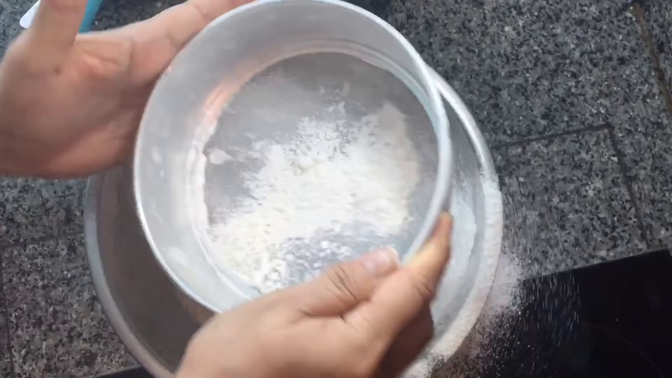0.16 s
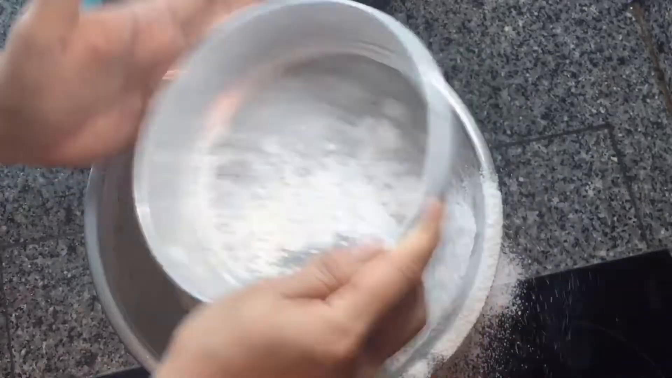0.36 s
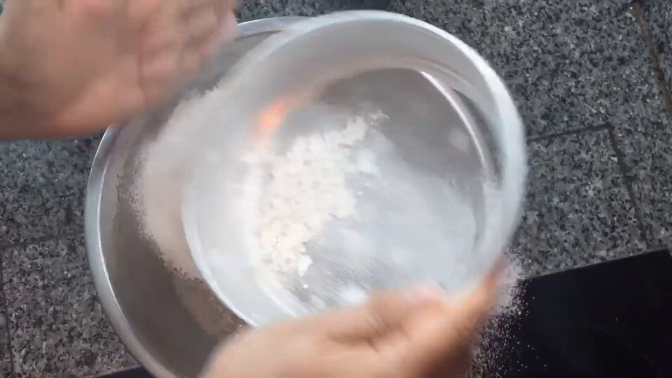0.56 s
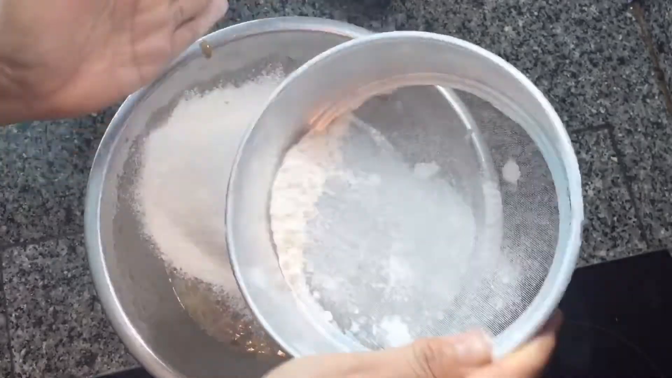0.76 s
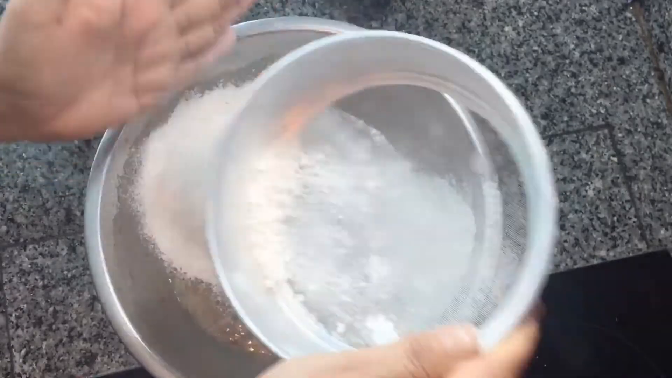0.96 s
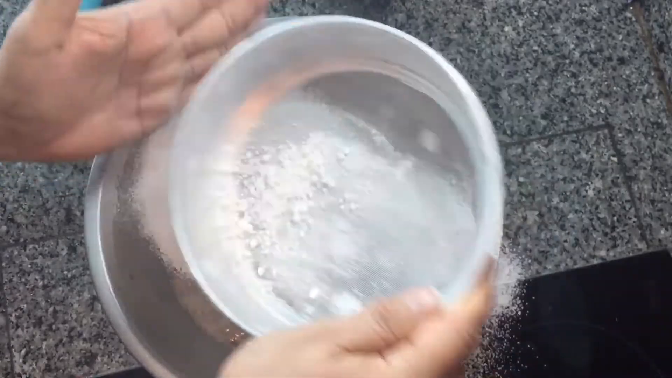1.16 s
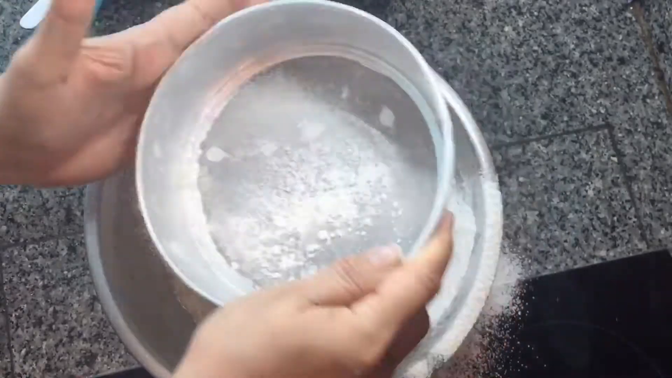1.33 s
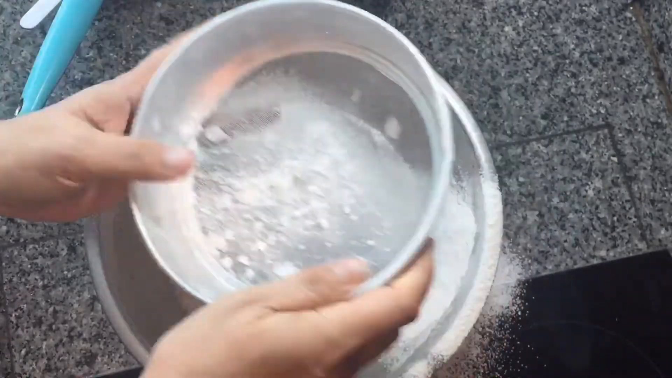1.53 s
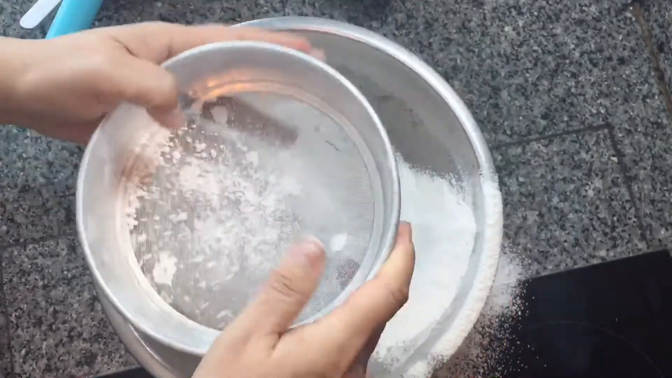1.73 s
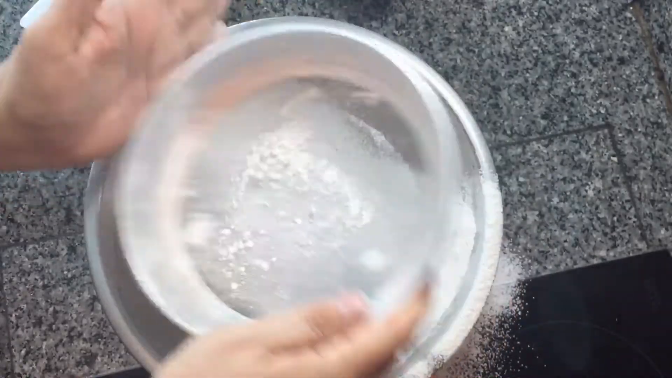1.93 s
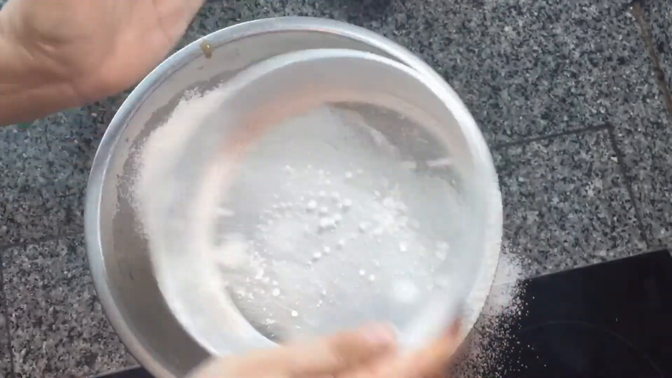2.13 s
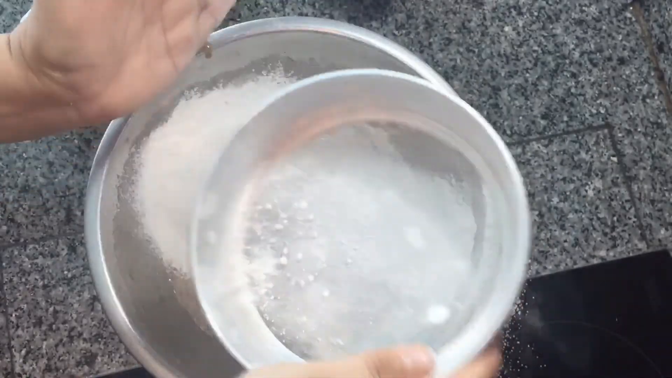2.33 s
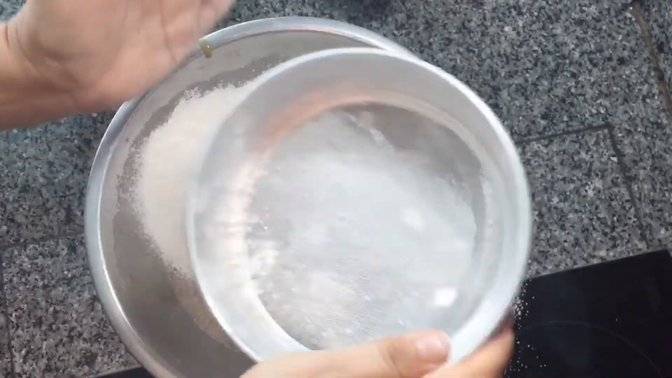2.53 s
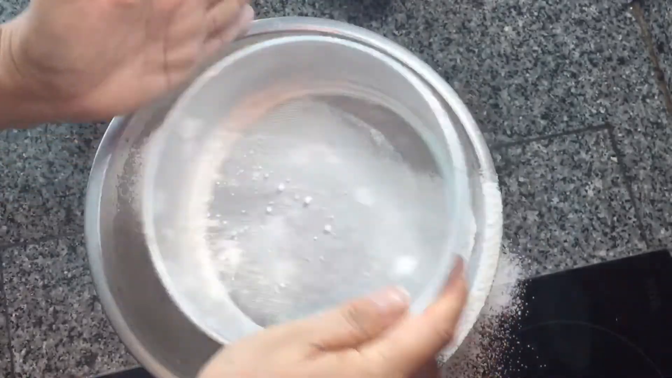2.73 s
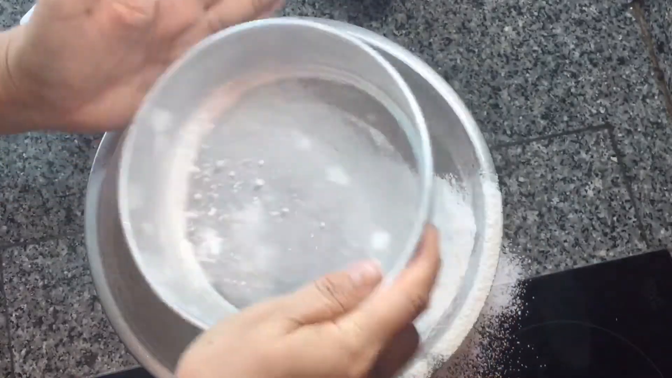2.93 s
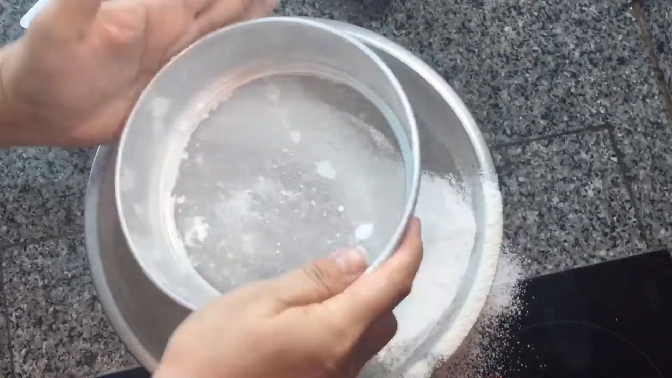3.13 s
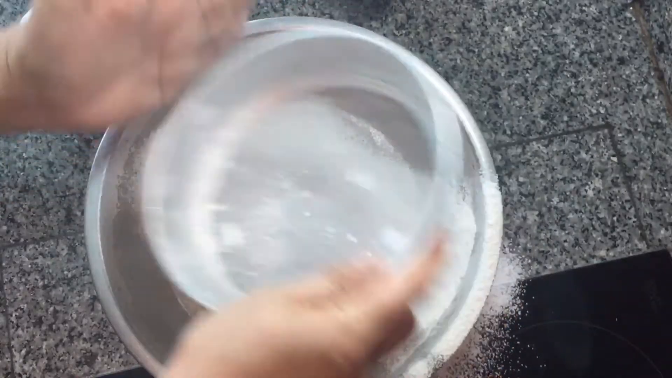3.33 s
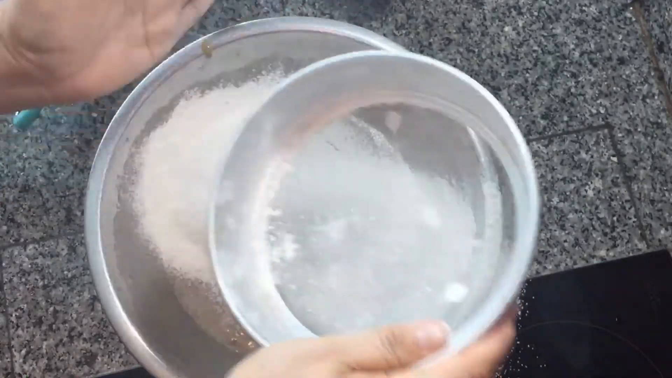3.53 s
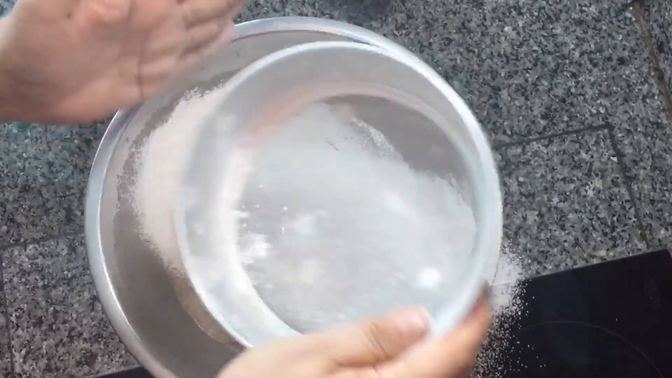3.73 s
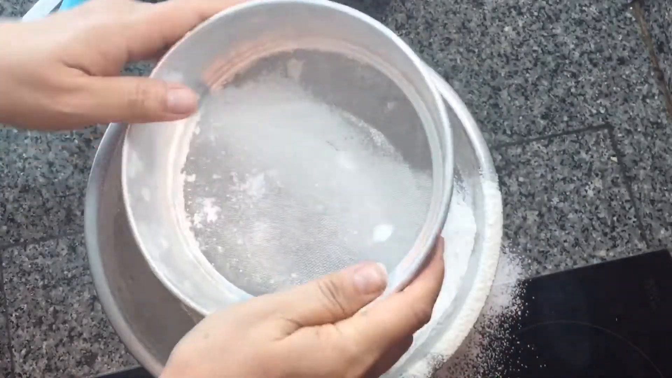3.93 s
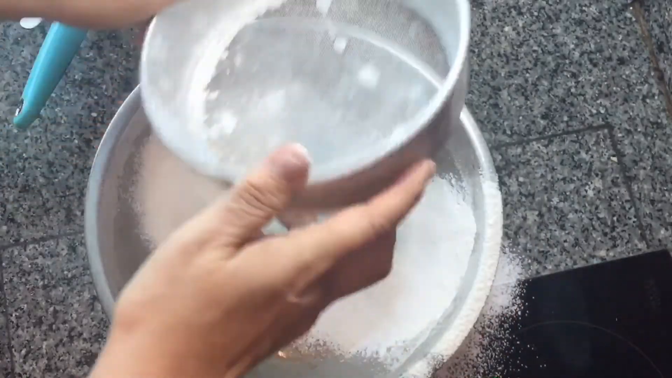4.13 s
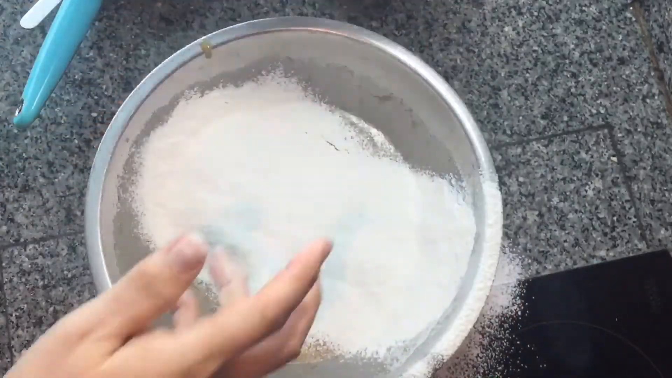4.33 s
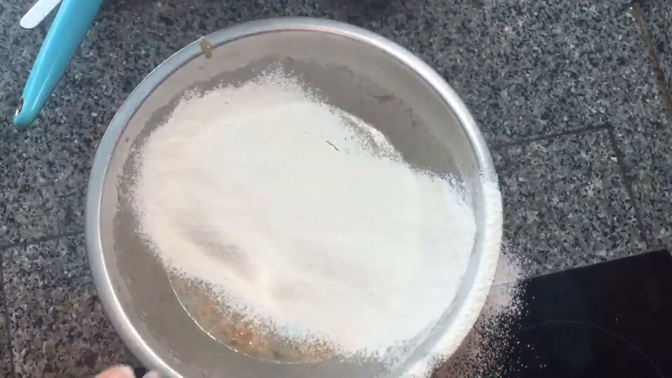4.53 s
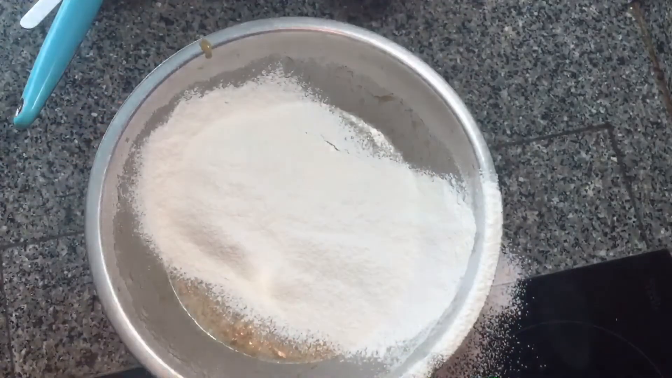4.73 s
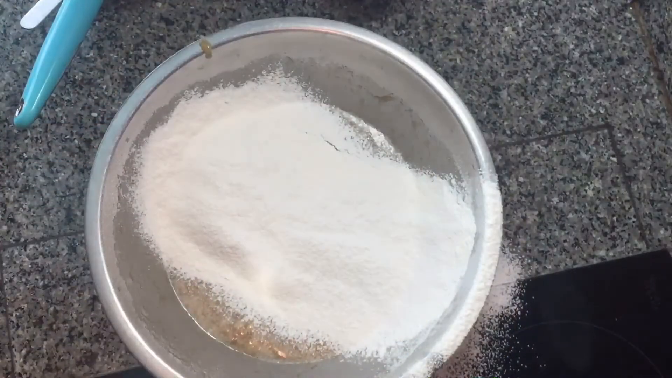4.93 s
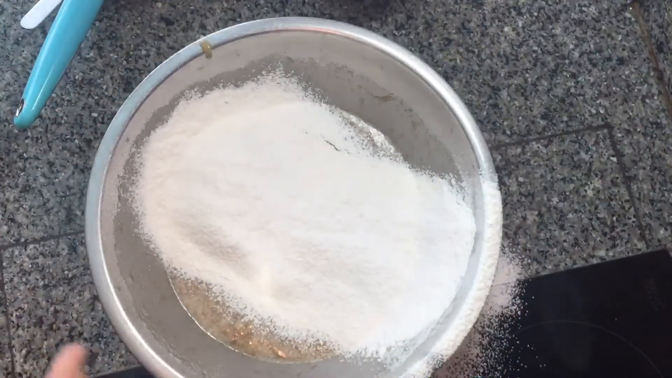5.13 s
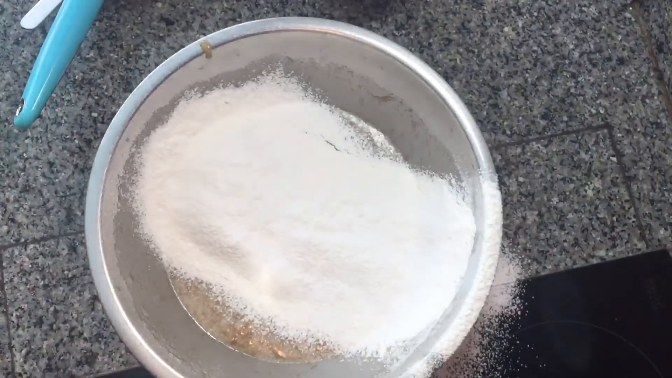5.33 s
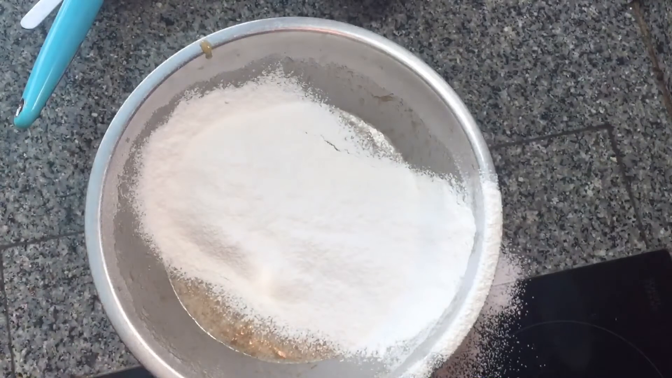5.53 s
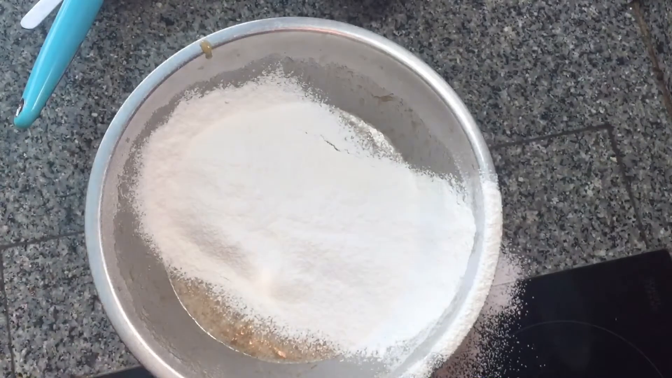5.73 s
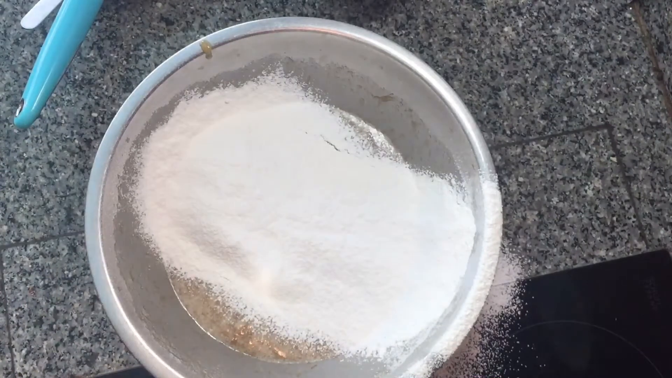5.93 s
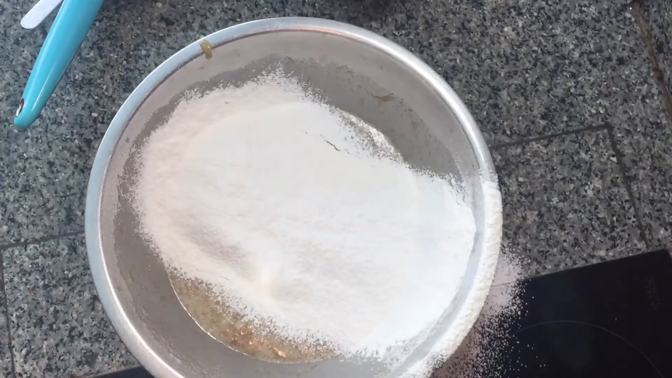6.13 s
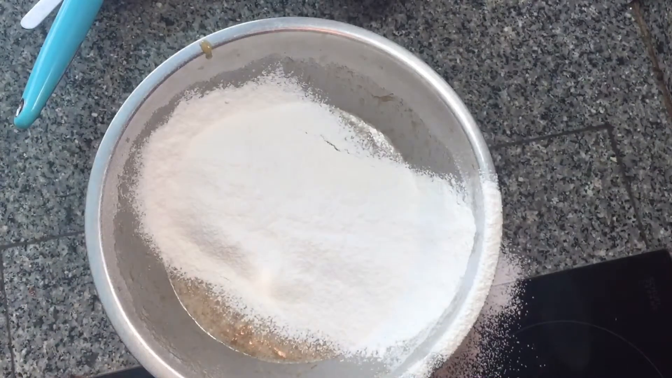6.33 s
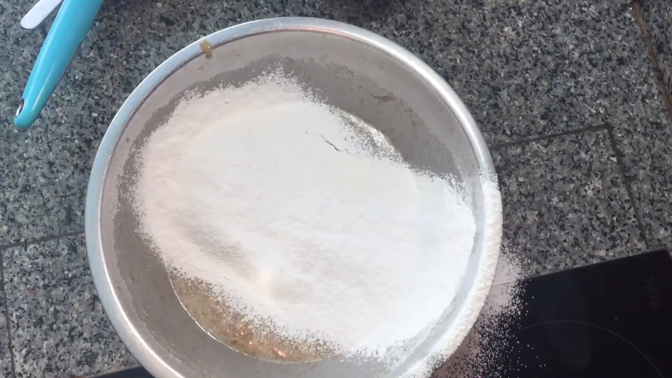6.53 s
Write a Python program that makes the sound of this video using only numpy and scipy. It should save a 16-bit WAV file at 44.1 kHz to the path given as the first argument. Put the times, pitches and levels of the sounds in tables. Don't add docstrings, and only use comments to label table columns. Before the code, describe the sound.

Brisk tinny taps on a hand-held sieve, a pause of dry finger rubbing, more taps, a ringing set-down, then soft palm brushing over low hum.

```python
import sys
import numpy as np
from scipy import signal
from scipy.fft import rfft, irfft, next_fast_len
from scipy.io import wavfile
from scipy.ndimage import uniform_filter1d, map_coordinates

SR = 44100
rng = np.random.default_rng(int(sys.argv[2]) if len(sys.argv) > 2 else 0)


def linear_from_db(decibels):
    return 10 ** (np.asarray(decibels, float) / 20)


def transcribe(signal):
    frames = np.atleast_2d(signal).T
    limited = np.clip(frames, -1, 1)
    pcm = np.round(limited * 32767).astype(np.int16)
    wavfile.write(sys.argv[1], SR, pcm)


N = 290178

# start in seconds, peak in dB, snap in dB, fizz in dB, rim note in Hz.
KNOCKS = [(0.0204, -27, 0, 1.5, 2100), (0.2402, -23, -5, -1.5, 2300), (0.482, -16, -6.5, -6, 2000),
          (0.7078, -23.5, -1, 2, 2600), (0.9466, -18.5, -8, -1.5, 2840), (1.1881, -17, -6.5, -8.5, 2750),
          (1.4143, -23, -3, 1, 2000), (1.6255, -36.5, -17, 2, 2700), (2.0632, -28.5, 3, 5, 2950),
          (2.2904, -31.5, -3, 10, 3800), (2.4998, -29.5, 4, 6, 3260), (2.7262, -19.5, -7.5, 3, 4040),
          (2.9578, -17, 3, -1.5, 2200), (3.2035, -14.5, -0.5, -6.5, 3250), (3.4591, -17.5, 0, -6, 2870),
          (3.7045, -19, -4.5, -4, 2150), (3.9433, -26.5, 0.5, 3, 2800)]
# time in seconds, hoop boom of a loose grip in dB, slap of a flat palm in dB.
GRIP = [(0, 0, -6.5), (.48, -13.5, -11), (.71, -13, -5), (.95, -7, -14.5), (1.41, -13, -7.5),
        (1.62, -3, -11), (2.06, -25, -10.5), (2.5, -16, -11.5), (2.96, -24, -18.5), (3.46, -23, -29),
        (3.72, -22, -7), (3.94, 0.5, 6)]
# time in seconds, peak in dB.
JOINT_HITS = [
    (1.6207, -46.5),
    (2.2845, -34),
    (3.4571, -39),
]
# frequency in Hz, width in Hz, level in dB.
RIM_MODES = [(2000, 47, 5.5), (2420, 32, 8), (2727, 62, 1.5), (3250, 1600, -12.5), (3720, 760, 0),
             (4540, 67, -25.5), (5600, 100, -6.5), (6420, 970, 3.5), (6300, 89, -5), (7200, 650, -0.5),
             (8590, 1600, 8.5)]
# frequency in Hz, width in Hz, level in dB.
HOOP_MODES = [(553, 11, -6), (600, 36, -0.5), (623, 7.9, -2), (620, 370, -17.5)]
# start in seconds, body in dB, crack in dB, crack centre in Hz.
CONTACTS = [
    (4.803, -17, -19, 5340),
    (4.8216, -20, -34, 4000),
    (4.835, -30.5, -47, 3950),
    (4.845, -30, -61, 6000),
    (4.858, -35.5, -52, 5000),
    (4.8859, -52, -30.5, 8330),
    (4.91, -47, -34, 8940),
    (4.942, -61, -33, 7430),
    (4.965, -49, -38, 9100),
]
FREE_HZ = [542, 794, 866, 969, 1042, 1097, 1172, 1208, 1273, 1341, 1405, 1548, 1725, 2260, 2660, 3300, 3910,
           4330, 5590, 6700]
# strength in dB, t60 in seconds.
FREE_RING = [(-15, 0.11), (-8.5, 0.04), (-27, 0.12), (1.5, 0.17), (-8, 0.16), (-18, 0.2), (-5, 0.22),
             (-5, 0.14), (0, 0.15), (0.5, 0.17), (-18, 0.31), (0, 0.095), (-27.5, 0.36), (-11, 0.053),
             (0.5, 0.13), (-2.5, 0.083), (-7, 0.073), (-31, 0.037), (-34, 0.14), (-21, .08)]
# start in seconds, hold in seconds, level in dB, onset in dB per second.
DRAGS = [
    (4.94, 0.17, -49, 250),
    (4.79, 0.0092, -60, 730),
]
# frequency in Hz, level in dB per Hz.
GRIT_COLOUR = [(350, -14), (600, -5), (906, -7.5), (997, 1.5), (1590, -5), (1960, -4.5), (4280, -10),
               (16000, -27.5)]
# start in seconds, hold in seconds, level in dB, onset in dB per second.
FINGER_STROKES = [
    (1.58, 0.044, -61, 897),
    (1.64, 0.082, -55, 498),
    (1.808, 0.11, -48.5, 1002),
    (1.865, 0.0088, -61.5, 398),
    (1.985, .02, -68, 400),
    (3.99, 0.087, -52.5, 501),
    (4.165, 0.016, -45, 282.5),
    (4.215, 0.016, -53.5, 298.5),
    (4.29, .14, -73, 300),
    (4.5, .035, -65, 300.5),
]
# frequency in Hz, level in dB per Hz.
SLIDE_COLOUR = [(500, -39), (900, -17.5), (2000, -11), (4500, -15.5), (6400, -10), (8800, -3), (11600, 0),
                (14400, -3), (16000, -5.5)]
# start in seconds, frequency in Hz, width in Hz, length in seconds, level in dB.
SQUEAKS_TICKS_BUMPS = [(1.629, 2770, 90, 0.039, -55), (1.685, 6400, 91, 0.039, -56.5), (1.707, 8700, 201, 0.011, -61),
                       (1.799, 6300, 89, 0.061, -57), (1.804, 2870, 70, 0.016, -50.5), (1.82, 2030, 69.5, 0.02, -62),
                       (1.871, 964, 40, 0.029, -57), (1.874, 2370, 69.3, .03, -62), (1.908, 4470, 80, 0.029, -60),
                       (3.57, 13020, 6000, .008, -55), (3.6, 13000, 5000, .006, -62), (3.666, 11400, 7000, .012, -60),
                       (3.792, 14100, 3990, .008, -56), (3.9, 14000, 4000, .008, -65), (4.169, 2996, 2500, 0.031, -58),
                       (4.22, 2375, 69.8, 0.035, -64.5), (4.223, 6360, 150.6, .02, -58.5),
                       (5.555, 2000, 200, 0.037, -55.5), (5.634, 600, 201.6, 0.038, -47),
                       (5.636, 1600, 1797, 0.022, -53), (6.439, 1270, 250, 0.033, -48)]
# start in seconds, hold in seconds, level in dB, onset in dB per second, weight in dB.
PALM_STROKES = [
    (5.526, 0.19, -60, 249, -6.5),
    (5.942, .056, -41.5, 1499.5, -19.5),
    (6.247, 0.035, -63, 120, -19),
    (6.38, 0.037, -57.5, 204, -9),
    (6.46, 0.029, -47.5, 99, -13),
]
# frequency in Hz, level in dB per Hz.
SKIN_COLOUR = [(940, -52), (1600, -13.5), (2100, 3.5), (2570, -4), (3200, -2.5), (9150, -18.5),
               (10400, -21.5), (11500, -20), (16000, -24.5)]
# time in seconds, hum in dB.
HUM_LOAD = [(0, -39), (1.2, -42), (2.6, -42.5), (3.6, -43.5), (4.9, -42), (5.6, -40), (6.58, -37.5)]
# multiple of 100 Hz, level in dB.
OVERTONES = [(2.038, -19.5), (2.9, -18.5), (4.048, -20.5)]
# frequency in Hz, width in Hz, level in dB.
WHINE = [(2870, 15, -74.5)]
# frequency in Hz, level in dB per Hz.
AIR_COLOUR = [(20, -19.5), (40, -15.5), (53, -5), (75, -11), (120, -11), (200, -13), (340, -22), (600, -24),
              (800, -35), (1300, -40), (2500, -46.5), (5500, -50), (10000, -57.5), (16000, -59)]
# start in seconds, length in seconds, start pitch in Hz, end pitch in Hz, level in dB.
PEEPS = [
    (2.441, .05, 5200, 5030, -64.5),
    (2.524, 0.094, 4840, 3780, -55.5),
    (2.555, 0.15, 3540, 3310, -65),
    (4.62, 0.12, 6300, 5400, -72),
    (4.723, 0.045, 4670, 4540, -61),
    (5.38, 0.055, 6490, 6150, -72.5),
]
# frequency in Hz, t60 in seconds.
TILES_T60 = [(300, 0.95), (1000, 0.49), (3000, 0.61), (7000, 0.45), (15000, 0.23)]

THUD_DB, THUD_DB_PER_DB, USUAL_KNOCK_DB = -31, 0.95, -23.5
RIM_NOTE_DB, EDGE_HZ, EDGE_DB = 8, 6680, 6.5
DRAG_LIFT_DB_PER_S, FINGER_LIFT_DB_PER_S, PALM_LIFT_DB_PER_S = 210, 910, 520
DRY_EDGE_DB = -5.5
MAINS_HZ = 49.95
RUMBLE_DB, RUMBLE_SWAY_DB = -49.5, -2
BLUR_HZ, BLUR_HZ_PER_GLIDE_HZ = 80, 0.36


def unit(x):
    return x / np.sqrt(np.mean(x ** 2) + 1e-20)


def along(points, hz):
    f, v = np.transpose(points)
    return np.interp(np.log(hz + 1), np.log(f + 1), v)


def curves(rows):
    s, *cols = np.transpose(rows)
    return [np.interp(np.arange(N) / SR, s, c) for c in cols]


def wobble(knots_per_s):
    knots = rng.standard_normal(int(N * knots_per_s / SR) + 4)
    return map_coordinates(knots, [np.arange(N) * knots_per_s / SR])


def filtered(x, response):
    m = next_fast_len(len(x) + 8192)
    return irfft(rfft(x, m) * response(np.fft.rfftfreq(m, 1 / SR)), m)[:len(x)]


def resonance(f, hz, width_hz):
    return 1j * f * width_hz / (hz * hz - f * f + 1j * f * width_hz)


def even(response):
    return response / np.sqrt(np.mean(abs(response) ** 2))


def hiss(gain, grain_db=0, patchy_db=0):
    z = signal.stft(rng.standard_normal(N) * linear_from_db(grain_db * wobble(400)), nperseg=256)[2]
    field = uniform_filter1d(rng.standard_normal(z.shape), size=6, axis=0)
    field = uniform_filter1d(field, size=7, axis=1)
    patchy = signal.istft(z * linear_from_db(patchy_db * unit(field)), nperseg=256)[1][:N]
    return unit(filtered(patchy, gain))


def tone(hz, width_hz):
    return unit(filtered(rng.standard_normal(N), lambda f: resonance(f, hz, width_hz)))


def strokes(rows, lift_db_per_s):
    t = np.arange(0, N, 32) / SR
    gain = 0
    for s, hold_s, db, onset in rows:
        before_s, after_s = np.maximum(s - t, 0), np.maximum(t - s - hold_s, 0)
        gain = gain + linear_from_db(db - onset * before_s - lift_db_per_s * after_s)
    return np.interp(np.arange(N) / SR, t, gain)


def kitchen(x, wet_db):
    hz, t, z = signal.stft(rng.standard_normal(SR // 2), SR, nperseg=256)
    tail = signal.istft(z * linear_from_db(-60 * t / along(TILES_T60, hz)[:, None]), SR, nperseg=256)[1]
    tail = np.pad(tail / np.linalg.norm(tail), (150, 0))
    return linear_from_db(wet_db) * signal.fftconvolve(x, tail)[:len(x)]


def add(out, s, x):
    part = out[round(s * SR):][:len(x)]
    part += x[:len(part)]


def struck_metal(note_hz, slap_db, snap_db):
    spread_db = rng.normal(0, 3.5, len(RIM_MODES))
    modes = [(hz, width_hz, (-1) ** k * linear_from_db(db + d))
             for k, ((hz, width_hz, db), d) in enumerate(zip(RIM_MODES, spread_db))]

    def rim(f, low_hz, high_hz):
        return sum(g * resonance(f, hz, w) for hz, w, g in modes if low_hz < hz < high_hz)

    def metal(f):
        note = linear_from_db(RIM_NOTE_DB) * resonance(f, note_hz, 280)
        clack = even(rim(f, 0, 4800) + linear_from_db(6) * resonance(f, 2580, 3000) ** 2 + note)
        edge = linear_from_db(EDGE_DB) * resonance(f, EDGE_HZ, 600)
        snap = even(rim(f, 4800, SR) + linear_from_db(8.0) * resonance(f, 6840, 3000) ** 2 + edge)
        slap = even(resonance(f, 1001, 400) ** 2)
        return clack - linear_from_db(slap_db) * slap - linear_from_db(snap_db) * snap
    return metal


def hoop(f):
    return sum(linear_from_db(db) * resonance(f, hz, w) for hz, w, db in HOOP_MODES) * resonance(f, 500, 590)


def palm_knocks():
    out, lumps, t = np.zeros(N), np.zeros(N), np.arange(SR // 6) / SR
    rise = 1 - np.exp(-t / 0.00033)
    fall = (linear_from_db(-60 * t / 0.028) + linear_from_db(-10.5 - 60 * t / 0.087)) * rise
    spark = (linear_from_db(-60 * t / 0.016) + linear_from_db(-16.5 - 60 * t / 0.061)) * rise
    thud = linear_from_db(-60 * t / 0.053) * (np.sin(2 * np.pi * 190 * t) + np.sin(2 * np.pi * 330 * t))
    thud = thud * (1 - np.exp(-t / 0.0073))
    loose_db, flat_db = curves(GRIP)
    for s, db, snap_db, fizz_db, note_hz in KNOCKS:
        boom_db, slap_db = loose_db[round(s * SR)], flat_db[round(s * SR)]
        thud_db = THUD_DB + THUD_DB_PER_DB * (db - USUAL_KNOCK_DB)
        metal = struck_metal(note_hz, slap_db, snap_db)
        fizz = lambda f: linear_from_db(fizz_db) * even(resonance(f, 11670, 7700) ** 2)
        force = linear_from_db(-16) * unit(rng.standard_normal(len(t)) * fall)
        dust = linear_from_db(-16) * unit(rng.standard_normal(len(t)) * spark)
        near = filtered(force, metal) + filtered(dust, fizz)
        impulse = np.linalg.norm(force) * (t == 0)
        around = filtered(impulse + 0.21 * force, lambda f: metal(f) + fizz(f))
        boom = unit(filtered(force, hoop))
        low = linear_from_db(db + boom_db - 12.5) * boom + linear_from_db(thud_db - 1) * thud
        add(out, s - .0005, linear_from_db(db) * near + low)
        for early_s, early_db in JOINT_HITS:
            if 0 < s - early_s < .01:
                add(out, early_s, linear_from_db(early_db) * (filtered(dust, metal) + filtered(force, fizz)))
        add(out, s, kitchen(np.pad(linear_from_db(db) * around + low, (0, SR // 4)), wet_db=-17.5))
        hop = np.exp(-((t - .05) / .008) ** 2)
        add(lumps, s, linear_from_db(db + fizz_db - 43.5 + rng.normal(0, 3)) * hop)
        skid = np.linspace(0, 1, round(0.064 * SR))
        add(lumps, max(s - .05, 0), linear_from_db(-58 + rng.normal(0, 2.5)) * skid)
    return out + lumps * hiss(lambda f: resonance(f, 11000, 14000) ** 2, grain_db=3.0, patchy_db=8.5)


def free_sieve():
    place_db = rng.normal(0, 5.4, len(FREE_RING))

    def body(f):
        total = linear_from_db(3.5) * resonance(f, 1140, 670)
        for k, (hz, (db, t60_s), p) in enumerate(zip(FREE_HZ, FREE_RING, place_db)):
            mode = resonance(f, hz, (1.9 + hz / 1500) / t60_s) / t60_s ** .5
            total = total + (-1) ** k * linear_from_db(db + p) * mode
        return total
    return body


def landing():
    out, t = np.zeros(N), np.arange(SR * 2 // 5) / SR
    for s, body_db, crack_db, crack_hz in CONTACTS:
        contact_s = .0001 if s == CONTACTS[0][0] else .0002
        chatter = linear_from_db(-19.5 - 60 * t / 0.044) * rng.standard_normal(len(t))
        knock = np.exp(-((t - .0012) / contact_s) ** 2) + chatter
        ring = linear_from_db(-13.5) * unit(filtered(knock, free_sieve()))
        crack = rng.standard_normal(len(t)) * linear_from_db(-60 * t / 0.041) * (1 - np.exp(-t / 0.00085))
        edge = lambda f: linear_from_db(5) * (resonance(f, 5590, 254.3) - resonance(f, 6640, 270))
        crack = filtered(crack, lambda f: resonance(f, crack_hz, 9000) ** 2 + edge(f))
        thud = np.sin(2 * np.pi * 300 * t) * linear_from_db(-3.5 - 60 * t / 0.007)
        blow = linear_from_db(body_db) * (ring + thud) + linear_from_db(crack_db + 3.5) * crack
        add(out, s, blow + kitchen(blow, wet_db=-11))
    grit = hiss(lambda f: linear_from_db(along(GRIT_COLOUR, f)), grain_db=-0.5, patchy_db=2.0)
    return out + strokes(DRAGS, DRAG_LIFT_DB_PER_S) * grit


def fingers():
    def sing(f):
        rim = sum(abs(resonance(f, hz * k, 45 * k)) for hz, _, _ in RIM_MODES for k in (1, 2))
        return 1 + linear_from_db(2.0) * rim

    slide = hiss(lambda f: linear_from_db(along(SLIDE_COLOUR, f)) * sing(f), grain_db=3, patchy_db=1.5)
    out = strokes(FINGER_STROKES, FINGER_LIFT_DB_PER_S) * linear_from_db(2.0 * wobble(40)) * slide
    out = out + kitchen(out, wet_db=-15.5)
    for s, hz, width_hz, length_s, db in SQUEAKS_TICKS_BUMPS:
        u = np.linspace(0, 1, round(length_s * SR))
        rough = filtered(rng.standard_normal(len(u)), lambda f: resonance(f, hz, width_hz))
        add(out, s, linear_from_db(db - 5.7 * u) * np.minimum(8 * u, 1) * unit(rough))
    return out


def hands():
    skin = lambda f: linear_from_db(along(SKIN_COLOUR, f))
    rub = hiss(lambda f: skin(f) * abs(resonance(f, 4500, 4954)), grain_db=1.2, patchy_db=2.2)
    dry_edge = hiss(lambda f: skin(f) / np.hypot(1, (7000 / (f + 1)) ** 4), grain_db=-0.5, patchy_db=1)
    weight = hiss(lambda f: resonance(f, 1330, 1030) ** 2, grain_db=1.5, patchy_db=5.0)
    light = strokes([row[:4] for row in PALM_STROKES], PALM_LIFT_DB_PER_S)
    heavy_rows = [(s, hold_s, db + weight_db, onset) for s, hold_s, db, onset, weight_db in PALM_STROKES]
    heavy = strokes(heavy_rows, PALM_LIFT_DB_PER_S)
    late = uniform_filter1d(light, size=1300, origin=640)
    out = late * rub + light * linear_from_db(DRY_EDGE_DB) * dry_edge + heavy * weight
    out = linear_from_db(0.7 * wobble(30)) * out
    return out + kitchen(out, wet_db=-5.5)


def appliance():
    db, = curves(HUM_LOAD)
    phase = 2 * np.pi * 2 * MAINS_HZ * np.arange(N) / SR + .06 * wobble(34)
    hum = np.sqrt(2) * linear_from_db(db + 0.45 * wobble(12)) * np.sin(phase)
    fuzz = sum(linear_from_db(g - 42.0) * tone(100 * k, width_hz=4.1) for k, g in OVERTONES)
    whine = sum(linear_from_db(g + 2.2 * wobble(6.4)) * tone(hz, w) for hz, w, g in WHINE)
    notch = lambda f: 1 - 0.15 * abs(resonance(f, 100, 24)) ** 2
    air = filtered(rng.standard_normal(N), lambda f: linear_from_db(along(AIR_COLOUR, f)) * notch(f))
    low = filtered(air, lambda f: 1 / (1 + (f / 600) ** 4))
    rumble_db = RUMBLE_DB + RUMBLE_SWAY_DB * wobble(1.5) + 0.61 * wobble(4.39)
    return hum + fuzz + whine + linear_from_db(rumble_db) * unit(low) + linear_from_db(-63.5) * unit(air - low)


def birds():
    out = np.zeros(N)
    for s, length_s, from_hz, to_hz, db in PEEPS:
        blur_hz = BLUR_HZ + BLUR_HZ_PER_GLIDE_HZ * abs(from_hz - to_hz)
        u = np.linspace(0, 1, round(length_s * SR))
        blur = unit(filtered(rng.standard_normal(len(u)), lambda f: 1 / (1 + (f / blur_hz) ** 2)))
        whistle = np.sin(2 * np.pi * np.cumsum(from_hz + (to_hz - from_hz) * u) / SR)
        add(out, s, linear_from_db(db) * blur * np.sin(np.pi * u) * whistle)
    return out + kitchen(out, wet_db=1.5)


def scene():
    return (palm_knocks() + landing() + fingers() + hands() + appliance() + birds())[None]


def low_pass(x):
    return signal.sosfilt(signal.butter(12, 15800, fs=SR, output="sos"), x)


def record(dry):
    band = lambda f: 1 / np.sqrt((1 + (f / 15750) ** 90) * (1 + (35 / (f + 1)) ** 8))
    passed = filtered(dry[0], band)
    passed = passed / (1 + abs(passed / .9) ** 4) ** (1 / 4)
    return low_pass(passed[None])


dry = scene()
out = record(dry)
transcribe(out)
```